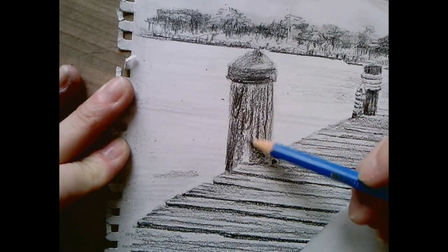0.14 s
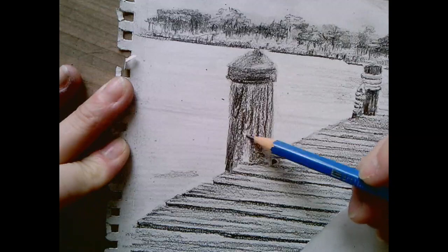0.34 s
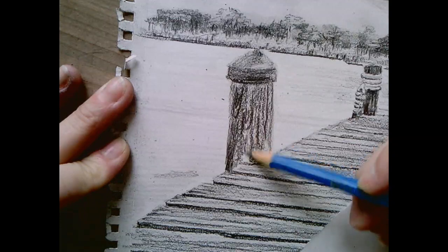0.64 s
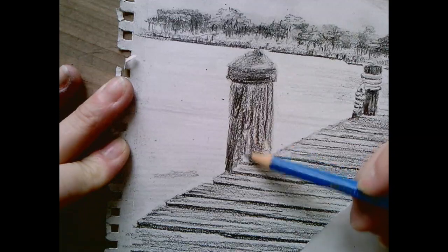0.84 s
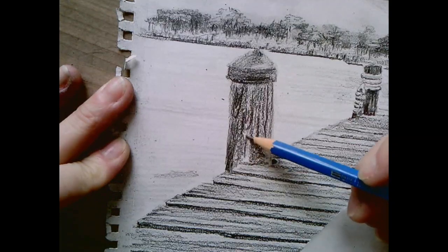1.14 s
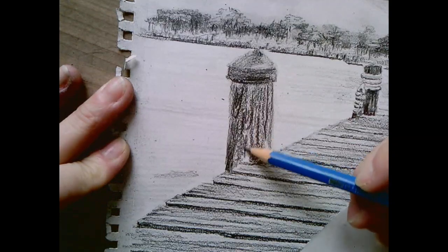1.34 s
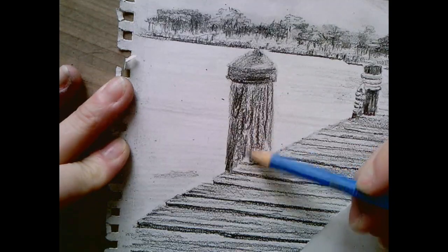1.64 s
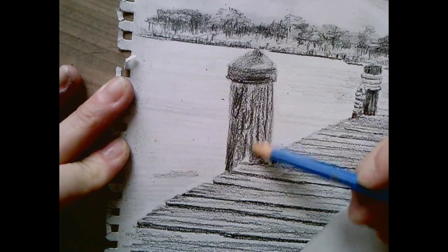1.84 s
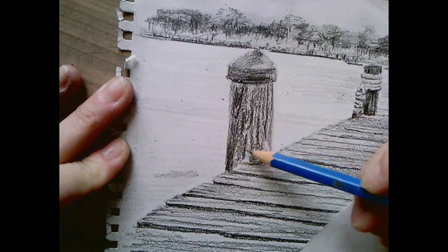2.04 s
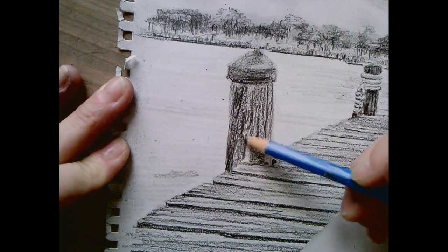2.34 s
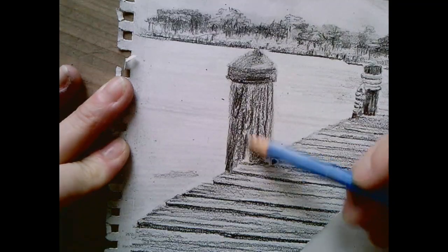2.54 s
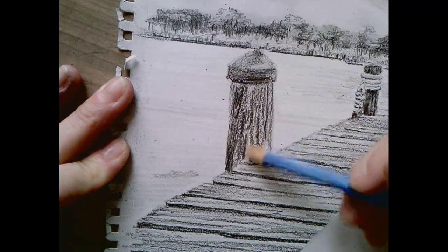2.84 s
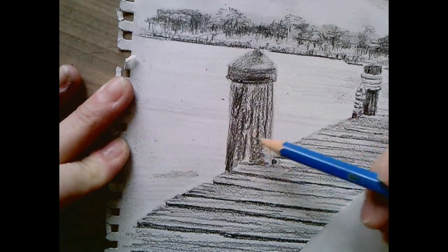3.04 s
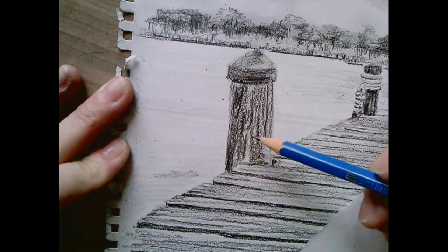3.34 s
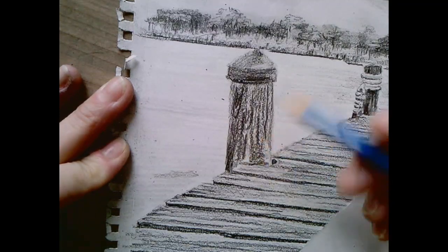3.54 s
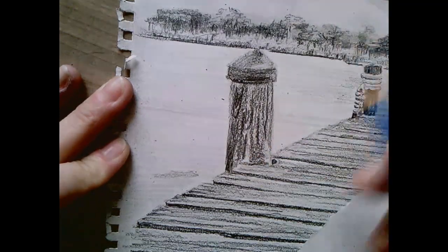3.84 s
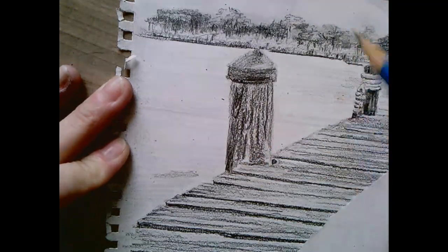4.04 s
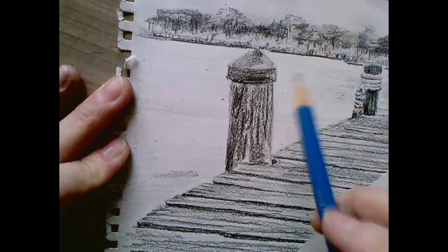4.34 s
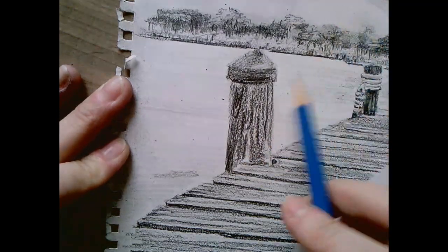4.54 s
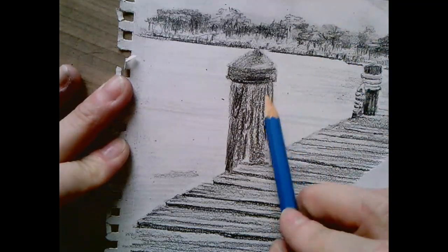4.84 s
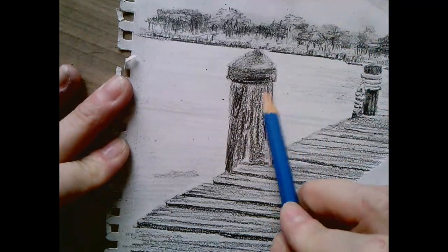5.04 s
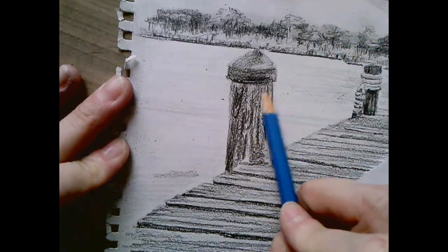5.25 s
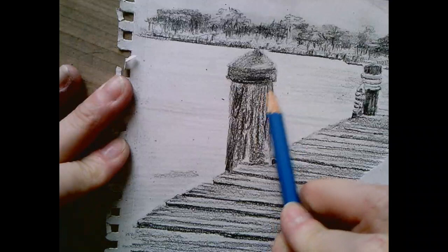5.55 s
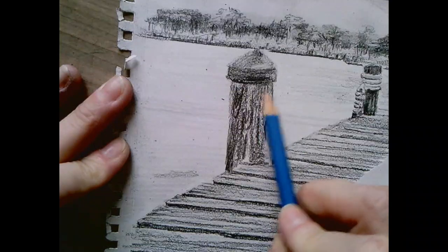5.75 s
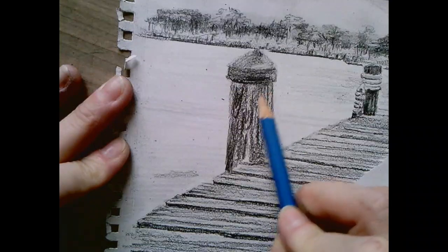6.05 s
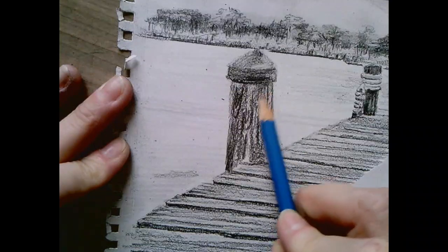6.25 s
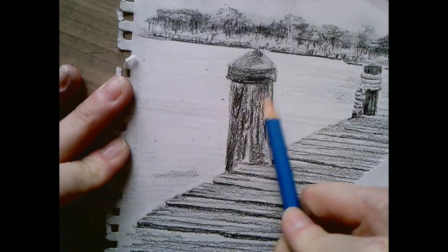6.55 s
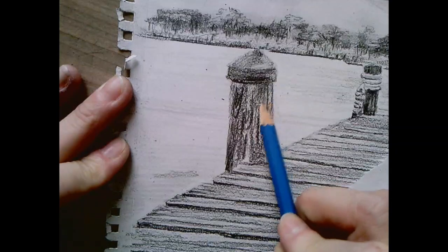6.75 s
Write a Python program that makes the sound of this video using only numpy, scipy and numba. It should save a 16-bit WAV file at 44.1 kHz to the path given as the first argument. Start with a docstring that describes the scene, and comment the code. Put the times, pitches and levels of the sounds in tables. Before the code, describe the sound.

A small, dry room, heard from a close microphone, with a steady low hum near 120 Hz, slowly beating fan tones and soft air. From 0.1 s a pencil shades sketch paper in short, grainy, bright hissing strokes, about eight or nine a second, then less regular from 1 s. A hard stroke with a hollow tap stands out at 1.6 s. After a gap around 2.0-2.35 s, four firm strokes lead to a strong last one at 2.8 s. A pause follows and the background sinks a little. At 3.56-3.62 s the hand bumps the table: a dull, tightly clustered, woody thud, the loudest event. Tiny ticks come at 3.86 and 4.35 s, a soft skin brush at 4.6 s and a hollow paper tap at 4.68 s. From 5.05 s to the end, faint even to-and-fro hatching, around five pulls a second, with slight taps, weakens gradually.

```python
"""At a table in a small room, a graphite pencil shades and hatches on a sheet of sketch paper.
Firm strokes with the side of the lead hiss as dense fibre clicks, filtered by lead and sheet; the landing lead
makes hollow taps. The hand bumps the table and its modes ring, the shaft ticks, skin brushes the paper, then the
point hatches faintly to and fro. Beneath lie a mains hum, two beating fans and moving air; a noise suppressor
lets everything through while there is enough treble and turns it down in the pauses."""
import sys
import numpy as np
from scipy import signal
from scipy.fft import rfft, irfft
from scipy.io import wavfile
from scipy.ndimage import uniform_filter1d, minimum_filter1d
from numba import njit

SR = 44100
rng = np.random.default_rng(int(sys.argv[2]) if len(sys.argv) > 2 else 0)


def put_to_file(sound):
    """Save the sound as 16-bit audio at rate SR, in the file named by the first command-line argument."""
    columns = np.atleast_2d(sound).T  # one column per channel
    safe = np.clip(columns, -1, 1)
    whole_steps = np.round(safe * 32767)
    wavfile.write(sys.argv[1], SR, whole_steps.astype(np.int16))


N = 304290
TIME = np.arange(N) / SR


def undb(db):
    """Logarithmic level: decibels to amplitude gain."""
    return 10 ** (np.asarray(db) / 20)


def unit(x):
    """Normalisation: scale to rms 1."""
    return x / np.sqrt(np.mean(x ** 2))


def colour(x, points):
    """Spectral shaping: filter by (Hz, dB) points, falling steeply below the first."""
    hz, db = np.transpose(points)
    f = np.maximum(np.fft.rfftfreq(N, 1 / SR), 1)
    below = np.minimum(f / hz[0], 1) ** 3
    gain = below * undb(np.interp(np.log(f), np.log(hz), db))
    return irfft(rfft(x) * gain, N)


def treble_above_10k(x, run_filter):
    """High-pass filtering: keep the treble above 10.5 kHz."""
    return run_filter(signal.butter(4, 10500, "high", fs=SR, output="sos"), x)


def resonate(x, hz, width_hz):
    """Resonance: a band-pass peak applied twice, for steep skirts."""
    b, a = signal.iirpeak(hz, hz / width_hz, fs=SR)
    return signal.lfilter(b, a, signal.lfilter(b, a, x))


def walk(rate):
    """Random modulation: levels held for 1 / rate s and smoothed twice, with rms 1."""
    k = int(SR / rate)
    held = np.repeat(rng.standard_normal(N // k + 1), k)
    smooth = uniform_filter1d(uniform_filter1d(held, k), k)
    return unit(smooth[:N])


def add(track, s, sound):
    """Superposition: mix a short sound in at a time in seconds."""
    i = int(s * SR)
    track[i:i + len(sound)] += sound[:N - i]


def room(x, wet_db, t60, gap_s):
    """Reverberation: direct sound, then after a gap a dense exponential decay from the walls."""
    t = TIME[:SR // 2]
    fade_in = np.clip(t / gap_s - 1, 0, 1)
    tail = rng.standard_normal(len(t)) * undb(-60 * t / t60) * fade_in
    return x + undb(wet_db) * signal.fftconvolve(x, tail / np.linalg.norm(tail))[:N]


MAINS_HZ, FAN_HZ, FANS_IN_STEP_S = 120.04, (57.9, 59.17), .68
# Spectrum of the moving air. Each row: frequency in Hz, relative density in dB per Hz.
AIR_SPECTRUM = [(30, -9), (42, -19), (80, -13), (125, 0), (175, -4), (230, -10.5), (300, -14.5), (420, -20),
                (620, -31), (950, -25), (1450, -25.5), (2800, -36.5), (5200, -41.5), (12000, -56.5)]


def background(hum_db=-48.5, waver_db=0.74, fan_db=-61, second_fan_db=-66, third_db=-72, air_db=-60.0):
    """Beating: two fan tones drift in and out of phase, beside a wavering mains hum and broadband air noise."""
    def tone(hz):
        return np.sqrt(2) * np.sin(2 * np.pi * hz * (TIME - FANS_IN_STEP_S))
    hum = undb(hum_db + waver_db * walk(18)) * tone(MAINS_HZ)
    fans = undb(fan_db) * tone(FAN_HZ[0]) + undb(second_fan_db) * tone(FAN_HZ[1])
    # third harmonic of the second fan, unsteady in level
    fans += undb(third_db + 3.3 * walk(5.9)) * tone(3 * FAN_HZ[1])
    air = undb(air_db + 0.5 * walk(7.4)) * unit(colour(rng.standard_normal(N), AIR_SPECTRUM))
    return hum + fans + air


TOUCH_S = .003  # time from first touch to full contact


def speed(moves, ahead=3):
    """Hand kinematics: lopsided bells of speed, heard from contact at `ahead` rise times before the peak."""
    power = np.zeros(N)
    for s, rise, fall, db in moves:
        near = slice(max(int((s - 3 * rise) * SR), 0), int((s + 3 * fall) * SR))
        t = TIME[near] - s
        contact = np.clip((t + ahead * rise) / TOUCH_S + 1, 0, 1)
        bell = np.exp(-(t / np.where(t < 0, rise, fall)) ** 2)
        power[near] += (contact * undb(db) * bell) ** 2
    return np.sqrt(power)


def tooth(rate, spread_db, patchy_db):
    """Impulsive friction: the lead snaps over fibres in uneven clicks, in rougher and smoother patches."""
    hit = rng.random(N) < rate / SR  # rate in clicks per second
    size = rng.standard_normal(N) * undb(spread_db * np.minimum(rng.exponential(size=N), 5))
    return hit * size * undb(patchy_db * walk(220))


def chatter(rate, length_s, low_hz=4300, high_hz=15000):
    """Stick-slip: the lead catches and sings a few milliseconds, each time at another pitch."""
    out, t = np.zeros(N), TIME[:SR // 30] - 1 / 60
    for when, pitch, size in rng.random((int(rate * N / SR), 3)):
        hz = low_hz * (high_hz / low_hz) ** pitch
        song = np.exp(-(t / length_s) ** 2) * np.cos(2 * np.pi * hz * t)
        add(out, when * TIME[-1], size * song)
    return unit(out)


def near_echoes(x, echo_db, lag_s, count=3):
    """Comb filtering: short reflections with randomly wandering lags notch the treble."""
    out = x
    for _ in range(count):
        lag = lag_s * SR * rng.uniform(.5, 2.0) * np.exp(.15 * walk(8.1))
        source = np.maximum(np.arange(N) - lag.astype(int), 0)
        out = out + undb(echo_db) * x[source]
    return out


# the lead meets the paper already moving: contact comes this many rise times before the highest speed
TOUCH_AHEAD = 1.25


def rub(strokes, fibres, lead, body, hiss_db, ring_db, chatter_db, ring_growth, sheen_growth):
    """Source and filter: fibre clicks hiss and excite resonances; growths are in dB per dB of force."""
    def drive(growth):
        moves = [(s, rise, fall, growth * db) for s, rise, fall, db in strokes]
        return speed(moves, TOUCH_AHEAD)
    scrape = unit(fibres) + undb(chatter_db) * chatter(rate=850, length_s=0.0047)
    hiss = unit(colour(near_echoes(scrape, echo_db=-7.5, lag_s=0.0011), lead))
    sheen = treble_above_10k(hiss, signal.sosfiltfilt)
    ring = unit(sum(undb(db) * resonate(fibres, hz, 1.09 * width) for hz, width, db in body))
    rubbing = drive(1) * (hiss - sheen) + drive(sheen_growth) * sheen
    return undb(hiss_db) * rubbing + undb(ring_db) * drive(ring_growth) * ring


# Strokes with the flat of the lead. Each row: time of highest speed in seconds, speeding-up time in seconds,
# slowing-down time in seconds, force in dB.
SHADING_STROKES = [(0.151, 0.016, .036, -8), (0.274, 0.02, .026, -0.5), (0.368, 0.026, 0.048, -.5),
                   (0.491, .018, 0.023, 1), (0.596, .021, 0.035, 1.5), (0.707, 0.0094, .045, 1),
                   (0.831, .027, 0.061, -2.5), (1.025, 0.05, .055, -1), (1.276, 0.032, 0.03, 0.5),
                   (1.40, 0.052, 0.14, -10), (1.618, 0.0079, .056, 11), (1.708, .022, 0.048, -9),
                   (1.836, 0.017, 0.054, 4.5), (1.966, .0074, 0.024, -8.5), (2.403, 0.039, 0.038, 5),
                   (2.512, 0.029, .03, 5), (2.614, 0.026, .027, 6.5), (2.754, 0.035, 0.016, 2.5),
                   (2.824, 0.02, .032, 10.5)]
# Colour of the lead held flat. Each row: frequency in Hz, relative level in dB.
FLAT_LEAD_COLOUR = [(2400, -2), (3800, -9.5), (4650, -1), (5250, 4), (6000, -12.5), (6800, -10.5),
                    (7400, -2), (8900, 0.5), (10100, -13), (11000, -14), (12200, -6), (12900, -9),
                    (13800, -2), (15400, -7.5)]
# Resonances of sheet and pencil in the flat grip. Each row: frequency in Hz, nominal width in Hz
# (before rub() scales it), relative level in dB.
FLAT_GRIP_RESONANCES = [(406, 130, 4), (790, 146, 7), (1476, 280, -4), (1674, 400, -1), (2030, 880, -8)]


def shading():
    """Sliding friction: firm strokes with the side of the lead, whose top octave grows fastest with force."""
    fibres = tooth(rate=6000, spread_db=1, patchy_db=1.1)
    return rub(SHADING_STROKES, fibres, FLAT_LEAD_COLOUR, FLAT_GRIP_RESONANCES, hiss_db=-70.5, ring_db=-69,
               chatter_db=-8, ring_growth=0.46, sheen_growth=1.44)


# a tap of TAP_DB lasts TAP_CYCLES; one that is TAP_HALVING_DB harder lasts half as long
TAP_DB, TAP_CYCLES, TAP_HALVING_DB = -51, 2.98, 20.5
# first rebound interval in seconds, and the share of it kept at each further rebound
REBOUND_S, REBOUND_SHARE = 0.016, .7
# The lead lands or presses on the slightly lifted sheet; the last two rows are low knocks of the upright #
# pencil's body near 390 Hz. Each row: time in seconds, direct peak level in dB, pitch in Hz, level change at
# each # rebound in dB.
SHEET_TAPS = [(0.473, -54.5, 843, -2.5), (0.705, -63, 790, -10), (1.009, -55.5, 856, -4),
              (1.619, -36.5, 844, -5), (1.824, -59.5, 790, -14), (2.524, -56, 825, -20),
              (2.743, -48.5, 1700, -5), (4.679, -38, 1195, -16), (5.727, -51, 1520, -14),
              (5.933, -61, 388, -10), (6.658, -60, 392, -12)]


def taps(count=3, detune=.04):
    """Air-spring resonance: the sheet on its air cushion gives a few hollow cycles, again at each rebound; the
    low rows near 390 Hz ring the upright pencil's body instead."""
    out, t = np.zeros(N), TIME[:SR // 10] - 1 / 20
    for s, db, hz, rebound_db in SHEET_TAPS:
        for k in range(count):
            length = TAP_CYCLES / hz * 2 ** ((TAP_DB - db) / TAP_HALVING_DB)
            note = np.exp(-(t / length) ** 2) * np.cos(2 * np.pi * hz * t)
            add(out, s - 1 / 20, undb(db) * note)
            # the next one is weaker, follows sooner and lies at a slightly different pitch
            s += REBOUND_S * REBOUND_SHARE ** k
            db += rebound_db
            hz *= 1 + detune * rng.standard_normal()
    return room(out, wet_db=-6.5, t60=0.37, gap_s=0.003)


# The hand bumps the table. Each row: time in seconds, relative force in dB, contact time in seconds.
HAND_BUMPS = [(3.5593, -7, 0.0014), (3.5654, 4, 0.0015), (3.572, 1, 0.0024), (3.5906, 4, 0.0029),
              (3.601, -10.5, 0.0019), (3.6191, -7.5, 0.0017)]
# Modes of the table top. Each row: frequency in Hz, relative level in dB, 60 dB decay time in seconds.
TABLE_MODES = [(106.6, -13, 0.15), (121, -5, 0.056), (166.1, -17, 0.4), (185.5, -6.5, 0.25),
               (233, -6, 0.11), (255, -16.5, 0.18), (343, -0.5, 0.15), (376.4, 1.5, 0.076),
               (411, -12, 0.11), (450.7, -13, 0.13), (522, -13, 0.092), (602, -20.5, 0.12), (730, -27, 0.1),
               (810, -27, 0.2)]


def table_bump(level_db=-23):
    """Modal excitation: soft pushes ring the table top, and a longer contact sounds duller."""
    force, t = np.zeros(N), TIME[:SR // 2]
    for s, db, contact in HAND_BUMPS:
        push = np.sin(np.pi * np.minimum(t / contact, 1)) ** 2
        add(force, s, undb(db) * push / push.sum())
    ring = np.zeros(len(t))
    for k, (hz, db, t60) in enumerate(TABLE_MODES):
        # neighbouring modes move the surface in opposite directions
        ring += (-1) ** k * undb(db - 60 * t / t60) * np.cos(2 * np.pi * hz * t)
    # the thud stays dull, with nothing above about 1.1 kHz, so that no click comes through
    low_pass = signal.butter(2, 1100, fs=SR, output="sos")
    thud = signal.sosfilt(low_pass, signal.fftconvolve(force, ring)[:N])
    return room(undb(level_db) * thud, wet_db=-17.5, t60=0.25, gap_s=0.011)


# The shaft ticks as the pencil is turned and set down. Each row: time in seconds, direct peak level in dB,
# pitch in Hz.
SHAFT_TICKS = [(3.855, -68, 4560), (3.874, -66, 3960), (4.340, -54, 2530), (4.352, -58.5, 1900),
               (4.678, -65, 3070)]


def ticks(decay_s=0.0023, width_share=0.45):
    """Damped resonance: tiny noise bursts through a broad peak give dry clicks of the wooden shaft."""
    out, t = np.zeros(N), TIME[:SR // 50]
    for s, db, hz in SHAFT_TICKS:
        burst = rng.standard_normal(len(t)) * np.exp(-t / decay_s)
        click = resonate(burst, hz, width_share * hz)
        add(out, s, undb(db) * click / np.abs(click).max())
    return room(out, wet_db=-8.5, t60=.3, gap_s=0.0037)


# The hand slides over the sheet. Each row: time of highest speed in seconds, speeding-up time in seconds,
# slowing-down time in seconds, level in dB.
HAND_SLIDES = [(4.59, 0.075, 0.046, -69.5), (4.80, 0.1, 0.11, -74)]


def slides():
    """Friction noise: skin brushes the paper with a soft, even hiss that follows the hand's speed."""
    skin = [(700, 6.5), (1500, 11), (3000, -4), (4300, -1), (5100, 2.5), (6300, -10),
            (9500, -12.5), (14000, -31)]  # (Hz, relative dB)
    return speed(HAND_SLIDES) * unit(colour(rng.standard_normal(N), skin))


PULL_RISE_S, PULL_FALL_S = 0.019, 0.029
# before each pull the point is pushed back up, lightly and evenly
PUSH_LEAD_S, PUSH_RISE_S, PUSH_FALL_S, PUSH_DB = 0.092, 0.028, 0.036, -3.5
# Pulls of the point. Each row: time of highest speed in seconds, force in dB.
HATCH_PULLS = [(5.144, 2.5), (5.354, 2), (5.533, -2.5), (5.724, 4.5), (5.926, -0.5), (6.098, .5),
               (6.301, -2), (6.474, 0.2), (6.655, -5.5), (6.864, -14)]
# Colour of the lead held upright. Each row: frequency in Hz, relative level in dB.
UPRIGHT_LEAD_COLOUR = [(2400, -5), (4200, -2), (5050, 5.5), (5600, -4.5), (6300, -1.5), (7300, -8),
                       (9300, -8), (10300, -8.5), (12000, -24), (15000, -30)]
# Resonances of sheet and pencil in the upright grip. Each row: frequency in Hz, nominal width in Hz
# (before rub() scales it), relative level in dB.
UPRIGHT_GRIP_RESONANCES = [(393, 55, 5.5), (1036, 300, -13), (1517, 280, -1.5), (1702, 140, -1),
                           (1880, 170, -10.5)]


def hatching():
    """Sliding friction: the point goes lightly to and fro over denser fibre clicks."""
    pulls = [(s, PULL_RISE_S, PULL_FALL_S, db) for s, db in HATCH_PULLS]
    pushes = [(s - PUSH_LEAD_S, PUSH_RISE_S, PUSH_FALL_S, PUSH_DB) for s, _ in HATCH_PULLS]
    fibres = tooth(rate=12000, spread_db=1.3, patchy_db=1.0)
    return rub(pulls + pushes, fibres, UPRIGHT_LEAD_COLOUR, UPRIGHT_GRIP_RESONANCES, hiss_db=-80.5,
               ring_db=-65.5, chatter_db=-13, ring_growth=1.5, sheen_growth=0.93)


@njit
def slew(x, up, down):
    """Slew limiting: follow a control by limited steps up and down."""
    out, y = np.empty(len(x)), 0.
    for i in range(len(x)):
        y += min(max(x[i] - y, -down), up)
        out[i] = y
    return out


# treble level at which the suppressor starts to open, range to fully open, and gain when shut
OPEN_DB, KNEE_DB, SHUT_DB = -84, 7, -7
LISTEN_S, OPEN_S, HOLD_S, CLOSE_S = 0.019, 0.23, 0.068, 0.37


def suppressor(x):
    """Downward expansion: gain opens on enough recent treble, holds a moment, then sinks back."""
    treble = treble_above_10k(x, signal.sosfilt)
    listen, hold = int(LISTEN_S * SR), int(HOLD_S * SR)
    # the origins make both windows look back only
    power = uniform_filter1d(treble ** 2, listen, origin=(listen - 1) // 2)
    treble_db = 10 * np.log10(np.abs(power) + 1e-18)
    wanted = np.clip((treble_db - OPEN_DB) / KNEE_DB, 0, 1)
    held = -minimum_filter1d(-wanted, hold, origin=(hold - 1) // 2, mode="nearest")
    opening = slew(held, 1 / (OPEN_S * SR), 1 / (CLOSE_S * SR))
    return undb(SHUT_DB * (1 - opening))


def scene():
    """Superposition: all sources add at one close microphone."""
    pencil = room(shading() + hatching(), wet_db=-14.5, t60=0.059, gap_s=0.008)
    return (background() + pencil + taps() + table_bump() + ticks() + slides())[None]


TOP_HZ = 15450


def record(dry):
    """Gating and band limiting: the recorder turns the pauses down and cuts the top steeply."""
    gated = dry * suppressor(dry[0])
    return signal.sosfilt(signal.ellip(10, .2, 70, TOP_HZ, fs=SR, output="sos"), gated)


dry = scene()
out = record(dry)
put_to_file(out)
```